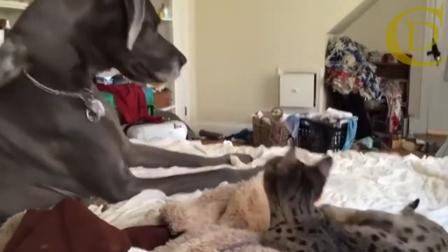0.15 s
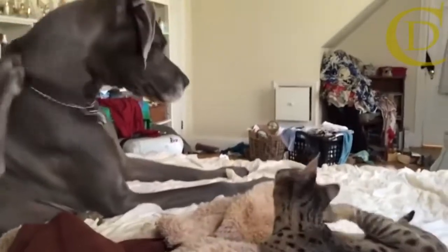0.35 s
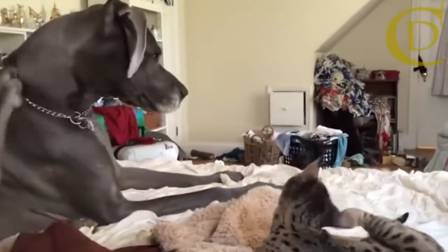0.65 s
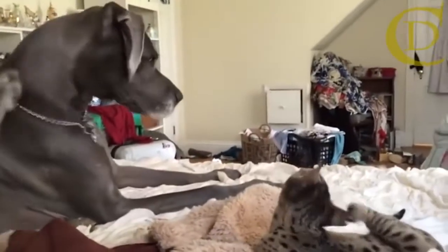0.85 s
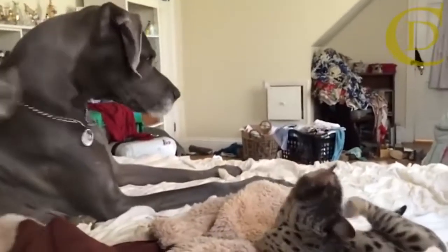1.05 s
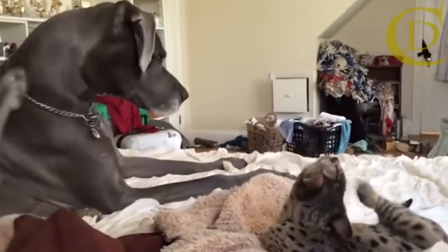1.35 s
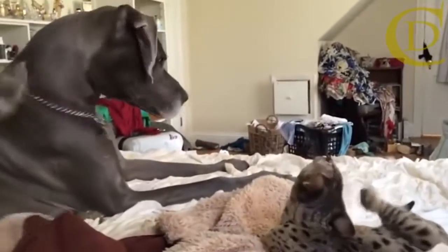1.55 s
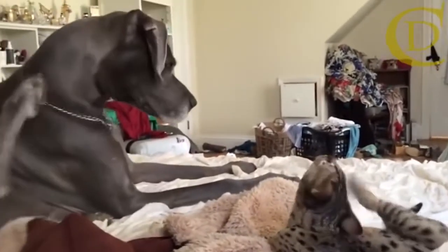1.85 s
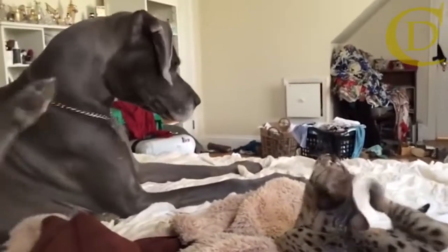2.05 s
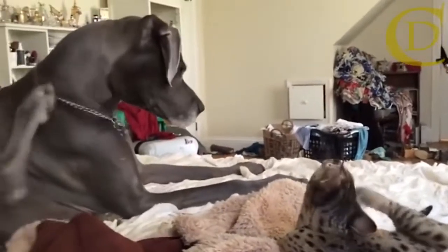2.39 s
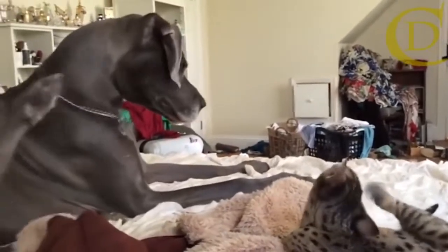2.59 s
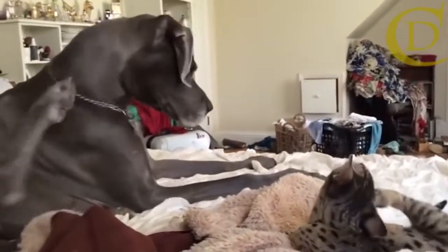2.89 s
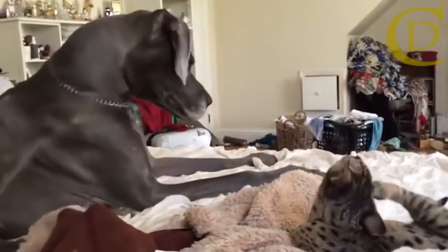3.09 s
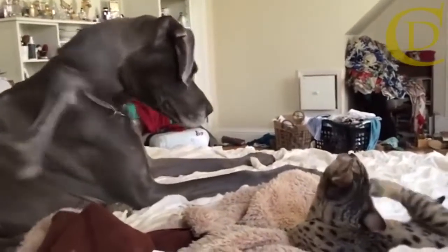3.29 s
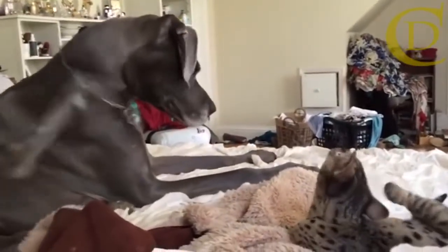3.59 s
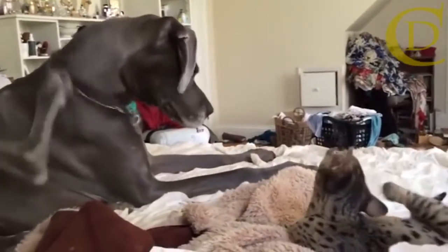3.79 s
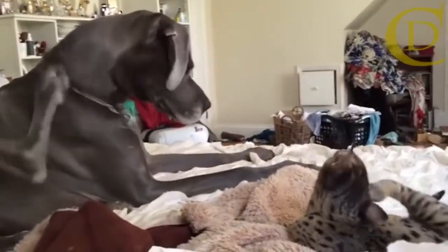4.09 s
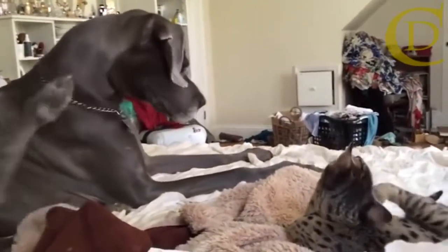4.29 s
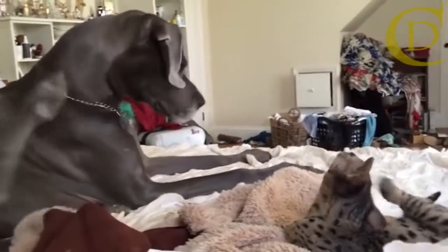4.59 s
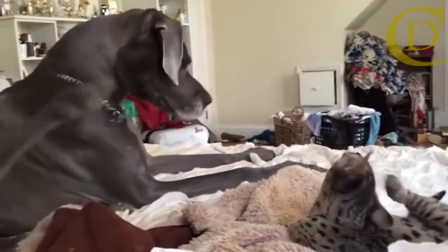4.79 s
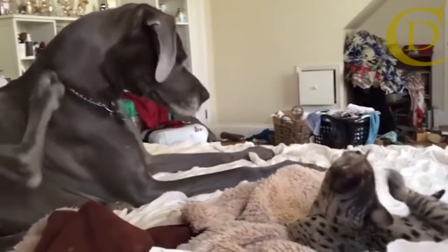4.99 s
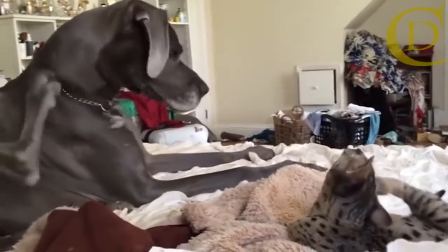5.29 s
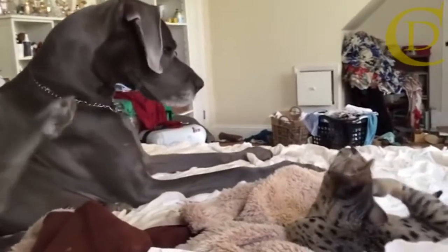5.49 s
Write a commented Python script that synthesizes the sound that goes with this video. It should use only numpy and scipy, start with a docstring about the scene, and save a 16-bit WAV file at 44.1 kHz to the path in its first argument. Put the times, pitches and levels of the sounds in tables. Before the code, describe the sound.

Irregular bright jingles and claw snaps over short fur and chain links, growing stronger as a dog scratches indoors over faint room rumble.

```python
"""Claws snap over fur and chain, a metal tag clinks, small links rattle and a paw thuds on the body:
a large dog on a bed scratches its neck with a hind paw in a soft, quiet bedroom over a low room rumble.
Snaps, scrapes and thuds are shaped noise; the tag is five fluttering mode pairs that a touch damps;
links are short sine chinks and clicks; sparse echoes make the room, and coloured noise its air."""
import sys
import numpy as np
from scipy import signal
from scipy.io import wavfile
from scipy.ndimage import uniform_filter1d

SR = 44100
rng = np.random.default_rng(int(sys.argv[2]) if len(sys.argv) > 2 else 0)


def dump_mix(stems):
    """Bounce the given channels to the path in sys.argv[1] as a 16-bit WAV at rate SR."""
    frames = np.atleast_2d(stems).T  # one column per channel
    limited = np.clip(frames, -1, 1)  # hard clip at full scale
    pcm = np.round(limited * 32767).astype(np.int16)
    wavfile.write(sys.argv[1], SR, pcm)


N = 249165  # samples, 5.65 s

# Strokes of the paw and lighter jerks of the neck, timed at the hardest contact:
# (time [s], thud level [dB], scrape level [dB], time for the scrape to fade 9 dB [s], chain rattle level [dB])
STROKES = [(.195, -70, -62, .04, -70), (.244, -70, -58, .005, -72), (.41, -70, -64, .03, -57),
           (.52, -67, -51, .01, -64), (.622, -59, -45, .02, -55), (.775, -70, -60, .03, -52),
           (.881, -54, -45, .02, -52), (1.149, -57, -60, .01, -64), (.95, -70, -64, .03, -54),
           (1.195, -70, -66, .02, -56), (1.25, -70, -70, .02, -56), (1.39, -70, -58, .03, -55),
           (1.47, -70, -62, .02, -55), (1.562, -60, -51, .01, -62), (1.646, -47, -41, .025, -52),
           (1.715, -70, -62, .02, -54), (1.817, -55, -47, .04, -60), (1.908, -51, -37, .04, -47),
           (2.073, -60, -48, .06, -62), (2.157, -45, -41, .06, -52), (2.28, -70, -60, .03, -57),
           (2.42, -52, -33, .03, -49), (2.648, -70, -62, .02, -56), (2.71, -57, -48, .03, -53),
           (2.81, -70, -65, .02, -60), (2.956, -51, -35, .02, -52), (3.015, -70, -50, .04, -47),
           (3.127, -67, -42, .01, -54), (3.211, -46, -35, .03, -54), (3.345, -68, -50, .02, -56),
           (3.396, -68, -42, .01, -60), (3.495, -55, -35, .03, -53), (3.682, -65, -40, .01, -56),
           (3.779, -44, -35, .03, -49), (3.9, -70, -55, .03, -54), (4.067, -54, -38, .05, -56),
           (4.135, -70, -54, .03, -48), (4.21, -70, -66, .02, -58), (4.263, -60, -43, .04, -72),
           (4.352, -48, -39, .03, -50), (4.478, -70, -62, .02, -62), (4.558, -53, -43, .06, -60),
           (4.651, -64, -37, .035, -54), (4.765, -70, -66, .03, -57), (4.82, -70, -68, .02, -60),
           (4.945, -48, -43, .04, -57), (5.058, -70, -70, .02, -57), (5.11, -70, -64, .03, -56),
           (5.144, -67, -45, .01, -60), (5.22, -70, -62, .03, -58), (5.25, -57, -56, .05, -60),
           (5.35, -70, -68, .03, -55), (5.54, -66, -41, .035, -56)]
# Pitches of the five tag modes: (frequency [Hz], one per mode)
TAG_HZ = (5018, 5890, 8880, 11880, 13060)
# How each tag mode rings: (split of the pair [Hz], t60 while free [s], flutter [share of pitch],
# level left after a touch [dB])
TAG_MODES = [(16.4, 0.51, 0.0037, -32), (14.3, 0.45, 0.0022, -16), (96, 0.25, 0.0072, -19),
             (38.5, .2, 0.00066, -30), (30.5, 0.2, 0.00099, -8)]
# Colour of metal contact: (frequency [Hz], relative level [dB])
METAL_COLOUR = [(1500, -31), (2500, -16.5), (4000, -8), (5500, -4.5), (7500, -5), (9000, 1), (11000, -3.5),
                (13000, -4.5), (15200, -8.5), (16000, -18.5)]


def gain_of(db):
    """Turns decibels into an amplitude factor."""
    return 10 ** (np.asarray(db) / 20)


def evened(x):
    """Scales a sound to rms 1."""
    return x / np.sqrt(np.mean(x ** 2) + 1e-20)


def read(points, hz):
    """Reads a (frequency, value) curve along log frequency."""
    f, value = np.transpose(points)
    return np.interp(np.log(hz + 1), np.log(f + 1), value)


def add(mix, s, sound):
    """Lays a sound into the mix from time s, cut at the end of the mix."""
    part = mix[round(s * SR):][:len(sound)]
    part += sound[:len(part)]


def pulse(colour, size=256):
    """The shortest causal (minimum-phase) pulse with a given spectrum, energy 1."""
    hz = abs(np.fft.fftfreq(2048, 1 / SR))
    log_gain = np.log(gain_of(np.maximum(read(colour, hz), -100)))
    spectrum = np.exp(np.conj(signal.hilbert(log_gain)))
    taps = np.fft.ifft(spectrum).real[:size]
    return taps / np.linalg.norm(taps)


def hiss(colour, patchy_db, size):
    """Noise from random short-time spectra with drifting louder and softer patches, rms 1."""
    frames, hz = 4 * N // size + 5, np.fft.rfftfreq(size, 1 / SR)
    real, imaginary, patches = rng.standard_normal((frames, len(hz), 3)).T
    patches = uniform_filter1d(patches, size=8, axis=0)  # smooth over frequency
    patches = evened(uniform_filter1d(patches, size=10, axis=1))  # smooth over time
    level = gain_of(read(colour, hz)[:, None] + patchy_db * patches)
    spectra = (real + 1j * imaginary) * level
    return evened(signal.istft(spectra, nperseg=size, noverlap=3 * size // 4)[1][:N])


def wander(shape, size):
    """Slow random drift along the last axis, rms 1."""
    smoothed = uniform_filter1d(rng.standard_normal(shape), size)
    return evened(uniform_filter1d(smoothed, size))


def ticks(per_s, spread_db):
    """Sparse clicks of random sign; a few are large."""
    size = gain_of(spread_db * np.minimum(rng.exponential(1, N), 4)) * rng.choice([-1., 1.], N)
    return size * (rng.random(N) < per_s / SR)


def swell(s, db, rise, fade):
    """A level that builds up into the moment s and trails after it; rise and fade are seconds per 9 dB."""
    t = np.arange(N) / SR - s
    return gain_of(db) * np.exp(-abs(t) / np.where(t < 0, max(rise, .001), max(fade, .003)))


def ticked(rows):
    """Hard contacts: for each row a metal-coloured tick with a short noisy crack, level from its second column."""
    tick, t = pulse(METAL_COLOUR), np.arange(400) / SR
    blows = 0.39 * rng.standard_normal((len(rows), len(t))) * gain_of(-60 * t / 0.016)
    blows[:, 0] = 1
    return [gain_of(row[1]) * np.convolve(blow, tick) for row, blow in zip(rows, blows)]


def lifted(x, hz, q, boost_db):
    """Adds a resonance round a pitch to a sound."""
    return x + gain_of(boost_db) * signal.lfilter(*signal.iirpeak(hz, max(q, .3), SR), x)


def air():
    """Room air: lumpy low rumble and thin hiss as shaped noise, plus faint tones of a distant appliance."""
    # Colour of the room air: (frequency [Hz], relative level [dB])
    air_colour = [(20, -1), (45, -7), (70, 7), (95, 4), (120, 7.5), (160, -2.5), (235, -0.5), (420, -10),
                  (700, -13), (1000, -14.5), (2500, -27.5), (7500, -34), (15300, -35), (16000, -66)]
    # Faint wavering tones of a distant appliance: (frequency [Hz], width [Hz], level [dB])
    hum = [(352, 19.5, -83), (526.5, 16, -83), (784, 4.9, -84)]
    air_db = -64
    t = np.arange(N) / SR
    rumble = hiss(air_colour, 4.35, size=2048)
    low = signal.lfilter(*signal.butter(2, 200, fs=SR), rumble)
    lumps = gain_of(2.2 * wander(N, size=1000)) - 1
    out = gain_of(air_db) * (rumble + low * lumps)
    for hz, width_hz, db in hum:
        size = round(SR / (3 * width_hz))  # a wider tone wavers faster
        sine_part = wander(N, size) * np.sin(2 * np.pi * hz * t)
        cosine_part = wander(N, size) * np.cos(2 * np.pi * hz * t)
        out += gain_of(db) * (sine_part + cosine_part)
    return out


def fur():
    """Hairs and links drag under the paw: hiss and crackle build up into each stroke and trail after it."""
    # Colour of the scrape: (frequency [Hz], relative level [dB])
    fur_colour = [(700, -14.5), (1200, -7), (1900, 2), (4500, 2), (7000, -8), (11000, -8), (15200, -8),
                  (16000, -21)]
    rest_db, rise_s = -69, 0.0057  # level between strokes, build-up per 9 dB
    pressure = gain_of(rest_db) + sum(swell(s, db, rise_s, fade) for s, _, db, fade, _ in STROKES)
    crackle = evened(signal.oaconvolve(ticks(900, 7.6), pulse(fur_colour))[:N])
    hairs = hiss(fur_colour, 3.5, size=256)
    roughness = gain_of(2.55 * wander(N, size=120))
    return gain_of(-8) * pressure * evened(hairs + 0.84 * crackle) * roughness


def chain(count=14):
    """Small links knock in clumps as short sine chinks and nudge the half-damped tag into tinkles."""
    rest_db, rise_s, fade_s = -76.5, 0.011, 0.053  # level between strokes; rise and fade per 9 dB
    out, t = np.zeros(N), np.arange(1500) / SR
    for hz in np.geomspace(4200, 14800, count):
        chink = gain_of(-60 * t / 0.007) * np.sin(2 * np.pi * hz * t) * np.minimum(t / 0.0004, 1)
        out += gain_of(-14) * signal.oaconvolve(ticks(150, 2.5), chink)[:N]
    for hz, db in zip(TAG_HZ, (-23, -23, -11.0, -16, -20.5)):
        for shift in (-.01, 0, .01):  # resting on fur or links detunes the modes
            nudges = ticks(130, 2)
            tinkle = gain_of(db - 60 * t / 0.023) * np.sin(2 * np.pi * hz * (1 + shift) * t)
            out += signal.oaconvolve(nudges, tinkle)[:N]
    fizz = hiss(METAL_COLOUR, 1.8, size=256)  # the finest links blur together
    out = evened(out) + gain_of(-6) * fizz
    clumps = gain_of(4 * wander(N, size=400))
    shake = gain_of(rest_db) + sum(swell(s, db, rise_s, fade_s) for s, *_, db in STROKES)
    return shake * evened(out * clumps)


def knocks():
    """Short clicks of links, and of claws on the chain at the strokes, each with a resonance at its own pitch."""
    # Short clicks of links, and of claws on the chain at the strokes: (time [s], level [dB], pitch [Hz])
    clicks = [(0.0752, -49.5, 6060), (0.181, -41, 4540.0), (0.196, -40, 8140), (0.2073, -47, 4330.0),
              (0.4525, -56, 8830.0), (0.5177, -40.5, 8600), (0.5626, -43, 8800), (0.7683, -38.5, 8700.0),
              (0.9895, -38, 8800), (1.0037, -43, 8800), (1.104, -47, 8960.0), (1.118, -40.5, 8870.0),
              (1.2402, -43, 9200), (1.2627, -41, 7580.0), (1.447, -35, 12210.0), (1.484, -45, 9240.0),
              (1.561, -46, 4010.0), (1.6536, -33, 3640.0), (1.6897, -32.5, 9000), (1.7286, -48, 8400.0),
              (1.9534, -32, 8510.0), (2.0555, -39.0, 12600), (2.166, -39, 6550.0), (2.2133, -28.0, 8200),
              (2.301, -50, 13050.0), (2.4145, -43, 3850.0), (2.4208, -40.0, 3790.0),
              (2.4957, -30.5, 7000.0), (2.8077, -33.5, 8650), (2.8265, -35.5, 10900), (2.933, -37, 9970.0),
              (2.9513, -35, 8590.0), (2.9628, -25, 4050), (2.992, -42, 9320.0), (3.0692, -37, 8960.0),
              (3.1239, -43, 4200.0), (3.2245, -26.5, 14300), (3.351, -26.5, 4570.0), (3.3953, -37.5, 4600),
              (3.4936, -43, 4270), (3.5011, -48, 4090.0), (3.5095, -32, 9190.0), (3.536, -33, 9600),
              (3.7801, -19.5, 4330), (3.7998, -28, 3790.0), (3.9101, -28.5, 9700), (3.946, -36, 12600.0),
              (3.967, -30.5, 5400.0), (4.0644, -30, 3530), (4.075, -23.5, 4330.0), (4.1565, -36, 11800.0),
              (4.219, -39, 8700), (4.224, -42, 8700), (4.391, -29, 12200), (4.4915, -33.5, 8600),
              (4.5024, -41.5, 9900), (4.5577, -48, 3570.0), (4.6762, -30, 8890.0), (4.7642, -34.5, 10500),
              (4.7853, -40, 10300), (4.804, -39, 10600), (4.822, -42, 10360.0), (4.9248, -63, 8940.0),
              (4.9453, -29.5, 4370.0), (4.954, -22, 3620.0), (5.004, -36, 7020.0), (5.1643, -57, 11610.0),
              (5.2225, -51, 11460.0), (5.2407, -34, 10000), (5.253, -42.0, 9900), (5.272, -54, 9670.0),
              (5.371, -43, 10490.0), (5.5, -48, 10830.0), (5.533, -49, 10440.0), (5.5377, -27.5, 4170)]
    out = np.zeros(N)
    for (s, _, hz), tick in zip(clicks, ticked(clicks)):
        add(out, s, lifted(tick, hz, q=12.3, boost_db=3))
    return out


def claws():
    """Each snap is a noise burst of uneven slips that swells, then fades, round its own pitch."""
    # Claw snaps: (time [s], relative level [dB], decay time [s], held to at least 0.0003, pitch [Hz])
    snaps = [(0.182, -43.5, 0.00091, 4520), (0.194, -46.5, 0.0013, 2340), (0.204, -44.0, 0.0012, 2480.0),
             (0.3703, -49, 0.001, 2650), (0.5187, -42, 0.002, 2600), (0.5236, -41, 0.0012, 1750),
             (0.614, -50, 0.00078, 2090.0), (0.62, -35, 0.0043, 1130), (0.794, -45.5, 0.0037, 3800),
             (0.871, -47.5, 0.011, 1660.0), (0.8806, -37, 0.0027, 5400), (1.3016, -44.5, 0.0033, 3840),
             (1.381, -46, 0.004, 5050), (1.46, -53, 0.00018, 5490.0), (1.5602, -37.5, 0.0014, 4030.0),
             (1.567, -42, 0.0032, 3790.0), (1.648, -30.5, 0.0032, 2040), (1.676, -43, 0.0034, 1850),
             (1.817, -38, 0.0015, 3510.0), (1.8253, -39, 0.002, 3530.0), (1.9048, -27, 0.0015, 1870.0),
             (1.906, -24.5, 0.0018, 1760), (1.9112, -28.5, 0.0032, 1610), (1.969, -49, 0.00089, 1790.0),
             (2.074, -36.0, 0.0023, 4110.0), (2.1548, -30.5, 0.00081, 1490), (2.1567, -28.5, 0.0014, 1240),
             (2.161, -30, 0.0006, 1510.0), (2.17, -41, 0.0012, 3250.0), (2.342, -43.5, 0.0011, 2450),
             (2.417, -40.0, 0.0015, 3920.0), (2.4212, -32, 0.00093, 5470.0), (2.4265, -26.0, 0.003, 4440.0),
             (2.601, -48, 0.004, 3630), (2.63, -43.5, 0.00085, 2080), (2.74, -44, 0.001, 4760.0),
             (2.805, -52, 0.003, 3360.0), (2.864, -51, 0.0037, 4480.0), (2.9604, -31, 0.0013, 2540),
             (2.9621, -28, 0.0024, 2540), (2.973, -49, 0.00089, 1660.0), (3.0175, -42, 0.0048, 4000),
             (3.129, -24, 0.0003, 3760), (3.213, -34.5, 0.0011, 3040.0), (3.22, -46, 0.0028, 3140.0),
             (3.269, -42, 0.0007, 5060.0), (3.342, -42, 0.0013, 5460), (3.3461, -33, 0.00079, 5300),
             (3.3965, -31, 0.0011, 3970), (3.4023, -42, 0.0027, 4000), (3.4934, -36.5, 0.0023, 1960),
             (3.5, -33.0, 0.002, 3290.0), (3.519, -43.0, 0.0078, 2630.0), (3.536, -41.5, 0.0049, 2420),
             (3.684, -29, 0.00071, 4410.0), (3.6921, -22, 0.00037, 3230), (3.696, -41, 0.0016, 2900),
             (3.775, -32, 0.0011, 4350.0), (3.7896, -27, 0.0026, 3960.0), (3.811, -42, 0.0069, 3800),
             (3.832, -34.5, 0.00093, 4600), (3.8989, -39, 0.00084, 2900), (4.0629, -30, 0.0067, 3550),
             (4.0726, -22.5, 0.0017, 3140), (4.112, -49, 0.005, 2300.0), (4.22, -45, 0.00059, 4610.0),
             (4.2664, -40.5, 0.0013, 1610), (4.354, -32, 0.0021, 1750), (4.36, -30.0, 0.0009, 2560),
             (4.392, -44.5, 0.0065, 2280), (4.501, -48, 0.0017, 3640.0), (4.56, -34.5, 0.0017, 3600),
             (4.567, -40, 0.0024, 3450.0), (4.5732, -52, 0.0011, 2970.0), (4.6477, -28, 0.0013, 3900),
             (4.6554, -28.5, 0.0023, 2290), (4.823, -56, 0.002, 4440.0), (4.9448, -30, 0.0039, 4330),
             (4.949, -25, 0.001, 3980.0), (4.9521, -29.5, 0.0017, 3830), (4.958, -40, 0.0031, 2860.0),
             (5.0096, -37.5, 0.0012, 4350.0), (5.135, -46, 0.001, 5340.0), (5.1445, -34, 0.00069, 3340),
             (5.2714, -58, 0.0022, 2200.0), (5.5406, -33, 0.005, 4080), (5.548, -33.5, 0.0031, 3980.0)]
    # Colour of the claws: (frequency [Hz], relative level [dB])
    claw_colour = [(500, -35.5), (800, -15.5), (1100, -6.5), (1850, -2.5), (3000, -5.5), (4500, -2),
                   (7000, 3.5), (12000, -2.5), (15200, -14), (16000, -58)]
    split_hz, treble_db = 4800, -13.5  # snaps are duller above the split
    out, t = np.zeros(N), np.arange(1300) / SR
    noise, slips = rng.standard_normal((len(snaps), len(t))), rng.random((len(snaps), len(t)))
    for (s, db, length, hz), grain, slip in zip(snaps, noise, slips):
        age = t / max(length, .0003)
        uneven = grain * (0.58 + 1.5 * (slip < .06))  # a few samples slip harder
        burst = uneven * np.exp(-age) * np.minimum(age / 0.27, 1)
        add(out, s, gain_of(db) * lifted(burst, hz, q=2.6, boost_db=5))
    low, high = (signal.butter(2, split_hz, kind, fs=SR) for kind in ("low", "high"))
    mixed = signal.lfilter(*low, out) + gain_of(treble_db) * signal.lfilter(*high, out)
    return gain_of(7.5) * signal.oaconvolve(mixed, pulse(claw_colour))[:N]


def collar(x):
    """Scrapes and snaps also shake the taut chain round the neck: resonances added to the sound."""
    # Resonances of the taut chain: (frequency [Hz], width [Hz], level [dB])
    resonances = [(1732, 54, -13), (2330, 870, -18), (3610, 340, -15.5)]
    return x + sum(gain_of(db) * signal.lfilter(*signal.iirpeak(hz, hz / width_hz, SR), x)
                   for hz, width_hz, db in resonances)


def thuds():
    """The paw lands on the body: a soft low push of fading noise with no ring."""
    # Colour of the thud: (frequency [Hz], relative level [dB])
    thud_colour = [(80, -26.5), (150, -2.5), (260, -3), (450, -8), (600, -4), (750, -23.5)]
    out, t = np.zeros(N), np.arange(2500) / SR
    for (s, db, *_), noise in zip(STROKES, rng.standard_normal((len(STROKES), len(t)))):
        add(out, s, gain_of(db - 60 * t / 0.058) * noise * np.minimum(t / 0.0052, 1))
    return gain_of(2) * signal.oaconvolve(out, pulse(thud_colour, size=1024))[:N]


def ring(mode_db, free_s, flutter, detune):
    """Each mode is a close pair that flutters as the tag swings and grazes; a touch of fur or chain damps it."""
    t = np.arange(flutter.shape[1]) / SR
    touched = np.maximum(t - free_s, 0)
    out = np.zeros(len(t))
    for hz, mode, db, sway, off in zip(TAG_HZ, TAG_MODES, mode_db, flutter, detune):
        split_hz, t60, share, left_db = mode
        turns = np.cumsum(hz * (1 + share * (sway + off))) / SR  # how the tag hangs shifts each blow a little
        pair = np.sin(2 * np.pi * turns) + .3 * np.sin(2 * np.pi * (turns + split_hz * t))
        damping_db = np.maximum(-2500 * touched, min(left_db, 0))  # falls 2500 dB per s to its floor
        out += gain_of(db - 60 * t / t60 + damping_db) * pair
    fade_in = np.sin(np.pi / 2 * np.minimum(t / .0004, 1)) ** 2
    fade_out = np.cos(np.pi * t / t[-1] / 2)
    return out * fade_out * fade_in


def tag():
    """A contact tick, then the ring; the place of the blow picks the modes, a hard blow favours the high ones."""
    # Blows on the tag: (time [s], tick level [dB], ring level [dB], place round the rim [turns],
    # hardness [dB per octave], free ringing time [s])
    clinks = [(0.41, -41, -31, 0.61, 9, 0.003), (0.4238, -55, -33.5, 0, 27, 0.0017),
              (0.4387, -38, -20.5, 0.54, 14, 0.0037), (0.6192, -31, -31.5, 0.52, 21, 0.009),
              (0.664, -50, -39, 0.024, 18, 0.0054), (0.698, -52, -33.5, 0.58, -3, 0.015),
              (0.756, -30, -45, 0.38, 11, 0.005), (0.8842, -38, -20, 0.69, -16.5, 0.007),
              (0.9179, -49.0, -31, 0.82, -6, 0.0049), (0.948, -41, -25.5, 0.86, -7.5, 0.012),
              (0.9812, -57.0, -36, 0.91, -2.5, 0.022), (0.998, -36, -38, 0.91, 12.0, 0.003),
              (1.1504, -37.5, -42.5, 0.825, -4, 0.033), (1.1967, -32.0, -26.5, 0.69, -17, 0.0018),
              (1.2087, -39, -33.5, 0.99, 14, 0.002), (1.346, -58, -38, 0.85, -7, 0.016),
              (1.3851, -49, -33.5, 0.83, -11.5, 0.02), (1.3983, -38, -36, 0.93, 11, 0.004),
              (1.4673, -14.5, -15, 0.48, 5, 0.003), (1.492, -50.0, -46, 0.6, 16, 0.037),
              (1.619, -55.0, -43, 0.97, 3, 0.0094), (1.6474, -37, -35, 0.525, 20, 0.007),
              (1.6663, -29.5, -37, 0.59, 18.0, 0.007), (1.7147, -19, -16, 0.9, 19, 0.0012),
              (1.74, -52.0, -50, 0.925, 15, 0.004), (1.7596, -42.0, -43, 0.91, 20, 0.011),
              (1.8852, -52.0, -44, 0.675, -6.0, 0.02), (1.9105, -20.0, -17.5, 0.51, 15, 0.004),
              (1.946, -30.0, -29, 0.52, 1, 0.013), (2.179, -26, -27, 0.87, 3, 0.002),
              (2.2, -39, -35, 0.85, 14, 0.014), (2.237, -35.0, -27.5, 0.86, -2, 0.008),
              (2.285, -45, -34, 0.22, -11.5, 0.00081), (2.35, -30.5, -44.5, 0.27, -6, 0.0033),
              (2.428, -46, -43, 0.55, 6.0, 0.011), (2.4353, -27, -41, 0.95, 12.0, 0.014),
              (2.445, -34.0, -29, 0.86, 6.0, 0.006), (2.5162, -33, -30.5, 0.5, 15, 0.0065),
              (2.555, -35, -53.5, 0.25, 10, 0.005), (2.6482, -36, -29.5, 0.925, 13, 0.015),
              (2.682, -35, -46, 0.75, 4, 0.004), (2.7148, -31, -32, 0.88, 20, 0.0063),
              (2.7385, -37, -27, 0.55, 16, 0.004), (3.0008, -31, -44, 0.81, 12.0, 0.0055),
              (3.0149, -23, -22.5, 0.91, 12.0, 0.008), (3.0203, -35, -17.5, 0.83, -8, 0.0023),
              (3.0756, -40, -36, 0.67, -22, 0.013), (3.0917, -32, -20, 0.516, 14, 0.0023),
              (3.214, -33, -36, 0.9, 12.0, 0.023), (3.2628, -26.0, -30, 0.71, -22.5, 0.049),
              (3.314, -31, -53, 0.15, 12.0, 0.006), (3.344, -24, -34.5, 0.35, -14.5, 0.005),
              (3.3712, -51, -48, 0.42, 12.0, 0.0067), (3.528, -31, -44, 0.36, -13, 0.009),
              (3.6208, -30, -49, 0.95, 16, 0.0047), (3.656, -41, -41, 0.975, 18.0, 0.003),
              (3.6652, -31, -34.5, 0, 36, 0.0033), (3.691, -33, -37, 0.97, 18.0, 0.0071),
              (3.774, -46, -42, 0.3, -17, 0.0043), (3.8272, -32.0, -30, 0.59, 3, 0.019),
              (3.888, -34, -37, 0.88, 21, 0.005), (3.9, -29.0, -28, 0, 30.0, 0.0022),
              (3.9191, -23.5, -28, 0.53, 11, 0.005), (4.104, -42.0, -34, 0.43, 7, 0.017),
              (4.1315, -24.5, -24, 0.0, 18, 0.0073), (4.1444, -28, -18, 0.58, 3, 0.0018),
              (4.195, -58.0, -46, 0.56, 6.0, 0.01), (4.213, -48, -37, 0.975, 18.0, 0.005),
              (4.354, -30, -32, 0.88, 6.0, 0.0099), (4.4798, -54, -37, 0.88, 0.0, 0.006),
              (4.5875, -55, -30.5, 0.49, 11, 0.058), (4.6472, -43.0, -65, 0.15, -30.0, 0.0033),
              (4.6607, -41.0, -38, 1, 9, 0.0069), (4.686, -25.5, -38, 0.67, 11, 0.002),
              (5.061, -40, -50, 0.87, 14, 0.032), (5.091, -39, -50, 0.15, 10, 0.014),
              (5.1128, -56, -51, 0.89, -31, 0.0065), (5.1302, -38.0, -64, 0.275, 11, 0.005),
              (5.356, -53, -55, 0.3, -16.5, 0.014), (5.492, -42, -37, 0.96, 18.0, 0.0064),
              (5.5468, -26, -29, 0.52, -2, 0.003)]
    # Each mode round the rim: (place where it swings most [turns], level there [dB],
    # level change half a turn away [dB])
    rim = [(0.14, -7.5, -33), (0.37, -13.5, -27), (0.11, -2.5, -17.5), (.73, -2.5, -77), (.25, 1, -63)]
    even_s = 0.16  # the longer the tag hangs free, the more evenly a blow reaches all modes
    out, (best, top_db, node_db) = np.zeros(N), np.transpose(rim)
    octaves = np.log2(np.divide(TAG_HZ, TAG_HZ[2]))
    detunes = rng.standard_normal((len(clinks), len(TAG_MODES)))
    flutters = wander((len(clinks), len(TAG_MODES), 4400), size=150)
    for clink, tick, flutter, detune in zip(clinks, ticked(clinks), flutters, detunes):
        s, _, ring_db, place, hard_db, free_s = clink
        add(out, s, tick)
        unevenness = max(1 - free_s / even_s, 0)
        place_db = top_db + unevenness * node_db * np.sin(np.pi * (place - best)) ** 2
        mode_db = ring_db + place_db + hard_db * octaves
        add(out, s, ring(mode_db, free_s, flutter, detune))
    return out


def bedroom(x, count=4):
    """Sparse echoes, each band dying at its own speed; their blend turns steadily, so no fixed colour stands out."""
    # Decay of the room: (frequency [Hz], t60 [s])
    decay = [(800, 0.24), (2100, 0.25), (5600, 0.13), (14700, 0.2)]
    taps = np.zeros((count, SR // 2))
    slots = np.arange(150, SR // 2 - 20, 20)  # one tap in every 20 samples
    places = slots + rng.integers(0, 20, (count, len(slots)))
    signs = rng.choice([-1., 1.], (count, len(slots)))
    np.put_along_axis(taps, places, signs, 1)
    hz, t, spectra = signal.stft(taps, SR, nperseg=256)
    fading = gain_of(-60 * t / read(decay, hz)[:, None])
    tails = signal.istft(spectra * fading, SR, nperseg=256)[1]
    turn = np.pi * (np.arange(N) / SR * 9 + np.arange(count)[:, None] / count)  # steady, 4.5 turns per s
    shares = np.sqrt(2 / count) * np.cos(turn)
    return signal.fftconvolve(x * shares, tails / np.linalg.norm(tails[0]), axes=1)[:, :N].sum(0)


def scene():
    """All layers sound over the air, directly and through the room."""
    metal = tag() + knocks() + chain()
    paw = collar(claws() + fur()) + thuds()
    wet = bedroom(gain_of(-8.5) * metal + gain_of(-6.5) * paw)
    return (metal + paw + wet + air())[None]


def record(dry):
    """The microphone rolls off near the top; then a steep low-pass limits the band."""
    edge_hz = 16400
    mic = signal.lfilter(*signal.butter(6, 15500, fs=SR), dry)
    band_limit = signal.firwin(511, edge_hz, window=("kaiser", 9), fs=SR)
    return signal.oaconvolve(mic, band_limit[None], "same")


dry = scene()
out = record(dry)
dump_mix(out)
```